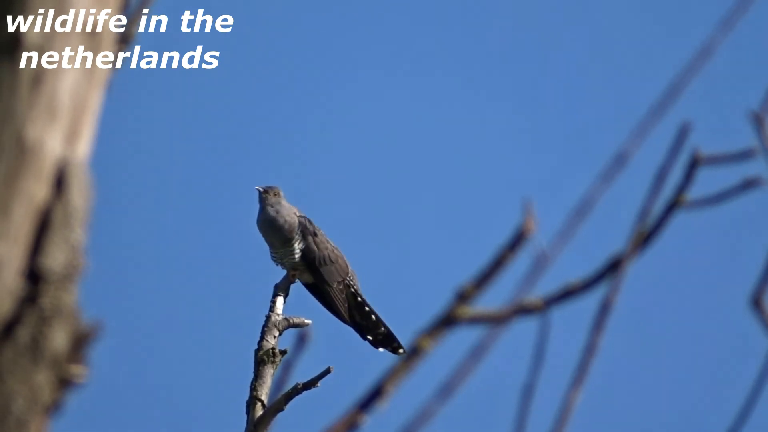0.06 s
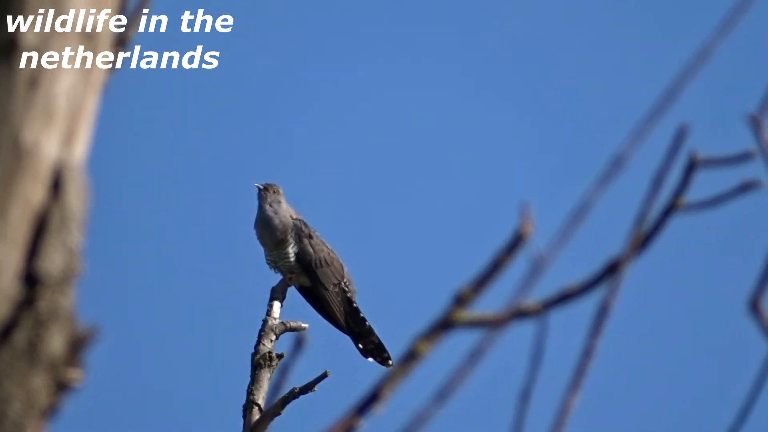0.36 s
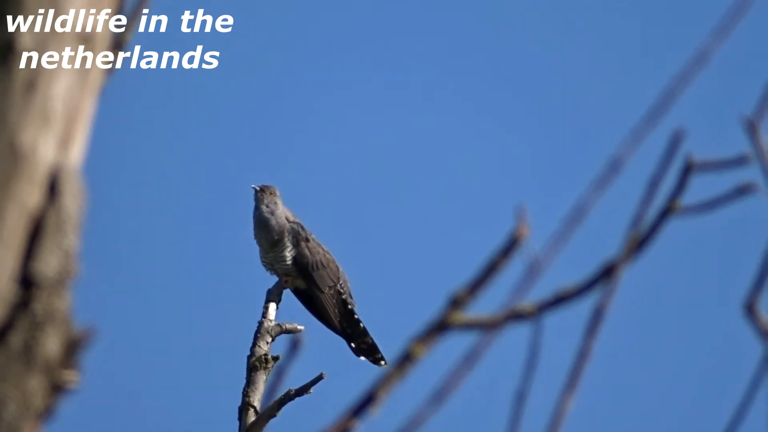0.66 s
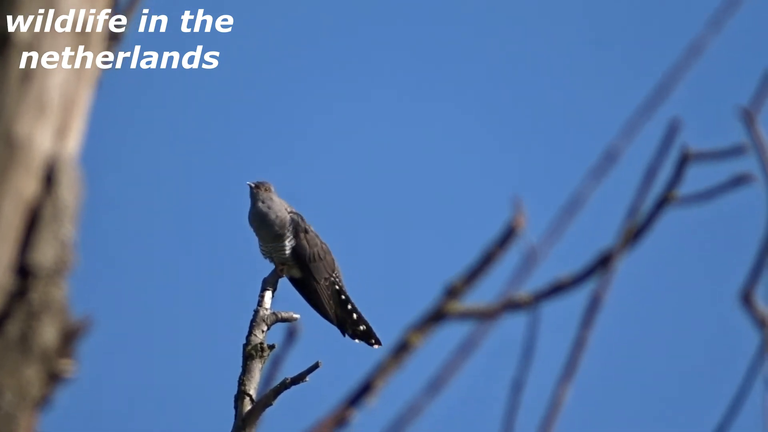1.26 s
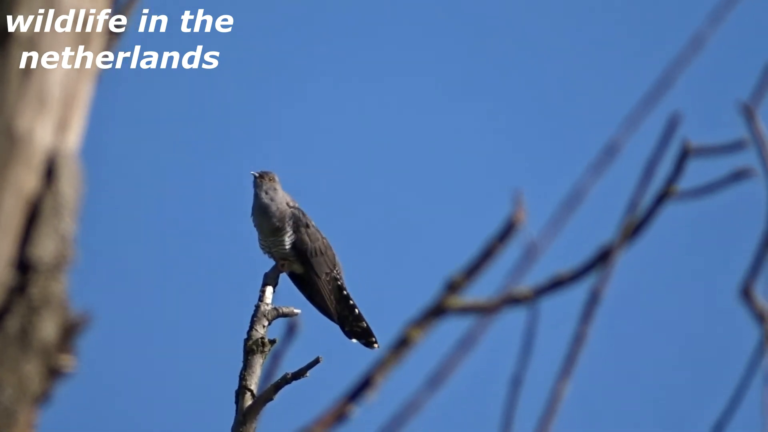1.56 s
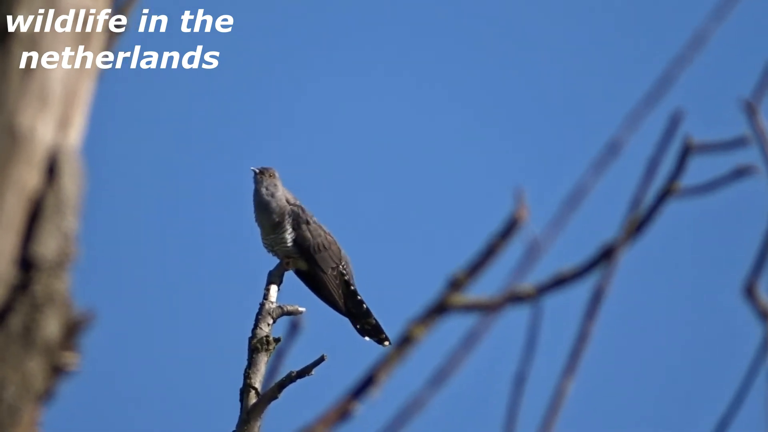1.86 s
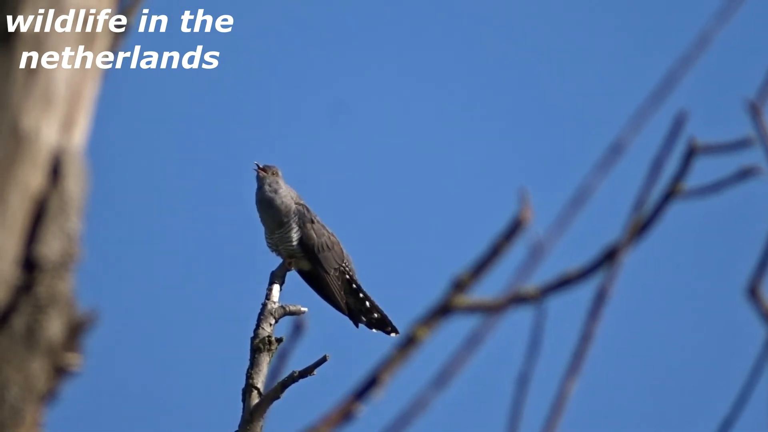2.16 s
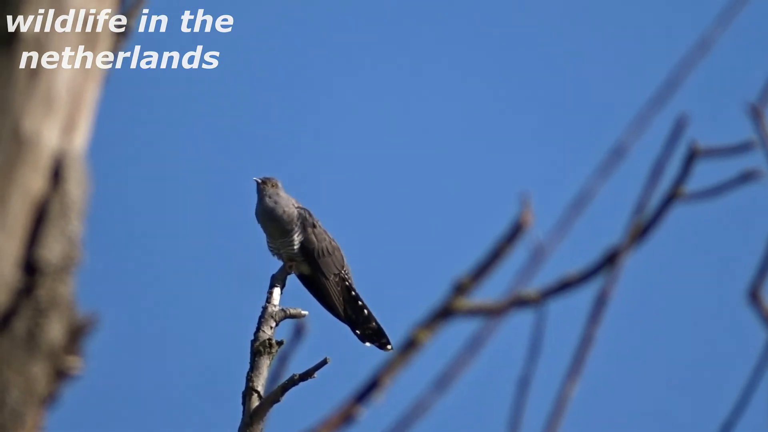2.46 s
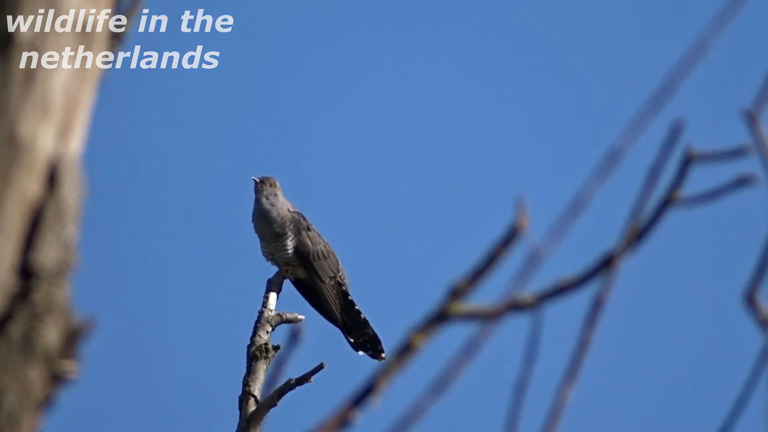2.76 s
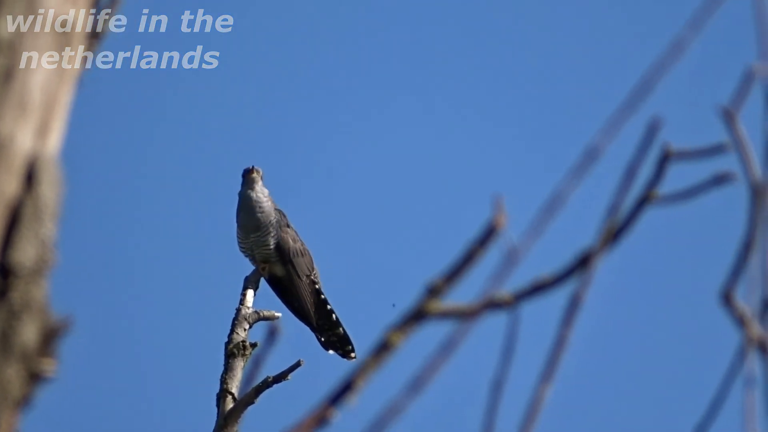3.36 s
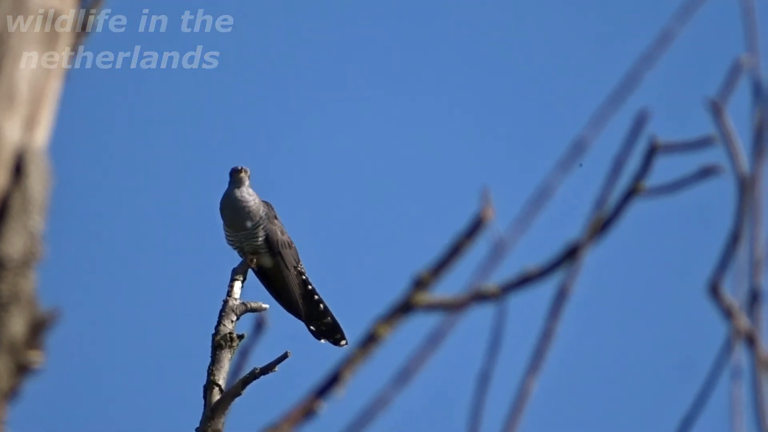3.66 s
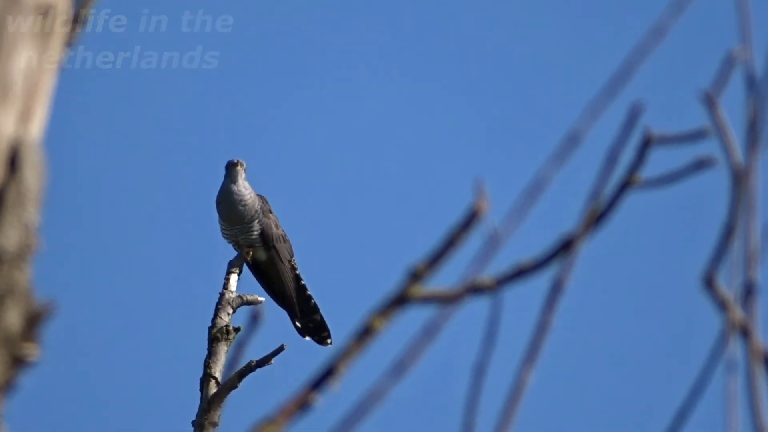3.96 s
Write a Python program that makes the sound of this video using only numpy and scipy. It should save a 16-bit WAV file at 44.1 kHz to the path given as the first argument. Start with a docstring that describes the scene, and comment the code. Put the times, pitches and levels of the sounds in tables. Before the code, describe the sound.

A cuckoo sings one low note at the start, then its falling two-note call at about 1.1, 2.3 and 3.5 seconds, echoing among trees. Small birds chirp and whistle throughout, over a soft hush, distant birdsong and a faint low hum. Light twig-like ticks come at about 1.8 and 3.6 seconds, and a small bird adds four quick swooping notes from 3 seconds.

```python
"""Over a soft outdoor hush, a low distant drone and a far chorus, small birds begin to whistle, a cuckoo
sings a long, level "coo", and a far bird pipes one note at intervals. From about one second on, the
cuckoo gives its full call three times: a short arched "cu", then the "coo", both nearly pure tones.
A twig-like tick falls midway; near the end come a warbler's four swoops, another tick and thin rasps.
The trees scatter the cuckoo's notes, the whistles and the piping into reverberation."""
import sys
import numpy as np
from scipy import signal
from scipy.fft import rfft, irfft
from scipy.io import wavfile
from scipy.ndimage import uniform_filter1d

SR = 44100
rng = np.random.default_rng(int(sys.argv[2]) if len(sys.argv) > 2 else 0)


def inscribe(sig):
    """Save sig as 16-bit PCM at rate SR to the path in sys.argv[1].

    A 1-D sig is mono; a 2-D sig holds one channel per row.
    Samples are clipped to [-1, 1] before scaling.
    """
    pcm = np.round(np.clip(np.atleast_2d(sig).T, -1, 1) * 32767)
    wavfile.write(sys.argv[1], SR, pcm.astype(np.int16))


N = 176400
# The cuckoo's "cu". Each row: start in seconds, length in seconds, top pitch in Hz, level in dB.
CU_NOTES = [(1.094, 0.0995, 699.7, -31), (2.282, 0.102, 702, -30), (3.526, .093, 697.7, -31)]
SIDE_SIGNS = np.array([[1], [-1]])  # a side signal adds on the left and subtracts on the right


def amp(db):
    """The decibel scale: 20 dB is a tenfold amplitude."""
    return 10 ** (np.asarray(db) / 20)


def unit(x):
    """Normalisation to an rms of 1."""
    return x / np.sqrt(np.mean(x ** 2))


def walk(rate):
    """Low-pass noise: random steps, `rate` a second, smoothed to a wander with a spread near 1."""
    k = max(int(SR / rate), 2)
    steps = np.repeat(rng.standard_normal(N // k + 1), k)
    return 1.3 * uniform_filter1d(uniform_filter1d(steps, k), k)[:N]


def colour(x, points):
    """Spectral shaping by a curve of (Hz, dB) points."""
    hz, db = np.array(points, float).T
    f = np.maximum(np.fft.rfftfreq(2 * N, 1 / SR), 1)
    return irfft(rfft(x, 2 * N) * amp(np.interp(np.log(f), np.log(hz), db)))[..., :N]


def span(start, length):
    """Sampling of a note: its indices i and the share u of it that has passed."""
    i = np.arange(max(int(start * SR), 0), min(int((start + length) * SR), N))
    return i, np.clip((i / SR - start) / length, 0, 1)


def fade(u, rise, fall):
    """A raised-cosine envelope; rise and fall are shares of the note."""
    attack = np.sin(np.pi / 2 * np.minimum(u / rise, 1))
    release = np.sin(np.pi / 2 * np.minimum((1 - u) / fall, 1))
    return (attack * release) ** 2


def phase_of(hz):
    """Phase is the running integral of frequency."""
    return 2 * np.pi * np.cumsum(hz) / SR


def trees(x, near_db, near_t60, far_db, far_t60, width):
    """Reverberation: quick scatter from near branches and a long, exponential tail from the wood."""
    t = np.arange(2 * SR) / SR
    out = 0
    for db, t60, onset_s in ((near_db, near_t60, .015), (far_db, far_t60, .08)):
        envelope = np.minimum(t / onset_s, 1) ** 2 * np.exp(-np.log(1000) * t / t60)
        mid, side = rng.standard_normal((2, len(t))) * envelope
        response = unit(mid + width * side * SIDE_SIGNS) / np.sqrt(len(t))
        out = out + amp(db) * signal.fftconvolve(x[None], response, axes=1)[:, :N]
    return out


def hush():
    """Broadband ambient noise, nearly coherent between the two sides in the bass."""
    # Each row: frequency in Hz, relative spectral density in dB.
    spectrum = [(22, -15.5), (38, -7.5), (55, -2.5), (72, -0.5), (95, -5.5), (150, -8.5), (210, -17),
                (450, -14.5), (700, -12), (1150, -21), (1700, -26.5), (2300, -26.5), (4200, -35),
                (5200, -43), (7500, -46.5), (9000, -33), (11000, -36)]
    mid, side = colour(rng.standard_normal((2, N)), spectrum)
    side = colour(side, [(50, -26), (250, -6), (5000, -7)])
    return unit(mid + side * SIDE_SIGNS) * amp(-52)


def drone():
    """A distant hum: three low partials under slow random amplitude and frequency modulation."""
    # Each row: frequency in Hz, level in dB.
    partials = [(54, -52), (93, -60.5), (146, -63)]
    return sum(amp(db + 1.4 * walk(9.5)) * np.sin(phase_of(hz * (1 + .0396 * walk(12))))
               for hz, db in partials)


def chorus():
    """Incoherent summation: many far birds blur into noise bands that flicker separately."""
    # Each row: frequency in Hz, relative spectral density in dB.
    spectrum = [(1800, -26.5), (2400, -8), (2900, -1.5), (3500, 0), (4050, -5), (4500, -15), (5200, -42)]
    # Each row: time in seconds, level in dB.
    levels = [(0, -51), (1.0, -55.5), (1.65, -53), (2.1, -57.5), (2.7, -54), (3.3, -54.5), (4, -50.5)]
    flicker_db = 4
    out, t = 0, np.arange(N) / SR
    for hz in np.geomspace(2000, 5000, num=14):
        band = [(hz / 1.12, -60), (hz / 1.03, 0), (hz * 1.03, 0), (hz * 1.12, -60)]
        mid, side = colour(rng.standard_normal((2, N)), band)
        out = out + amp(flicker_db * walk(13)) * (mid + .23 * side * SIDE_SIGNS)
    return unit(colour(out, spectrum)) * amp(np.interp(t, *np.array(levels).T))


def cuckoo_echo(call):
    """Reflection: single echoes from nearby trunks, then the wood's uneven reverberant tail."""
    # Each row: delay in seconds, gain in dB.
    reflections = [(.066, -19), (.182, -32)]
    # The wood returns the higher note more strongly. Each row: frequency in Hz, gain in dB.
    wood_gain = [(560, -1), (690, 2)]
    wood = lambda x: trees(x, near_db=-22, near_t60=.37, far_db=-18.5, far_t60=2.8, width=.067)
    trunks = sum(amp(db) * np.pad(call, (int(delay * SR), 0))[:N] for delay, db in reflections)
    # Of a "cu" sung just before the scene opens, only the echo is heard.
    i, _ = span(*CU_NOTES[0][:2])
    earlier = wood(np.pad(call[i], (0, N - len(i))))
    elapsed = int(.17 * SR)
    tail = wood(call) + np.pad(earlier[:, elapsed:], ((0, 0), (0, elapsed)))
    return colour(trunks + tail * amp(2 * walk(45)), wood_gain)


def whistles():
    """Frequency glides: the pitch of each songbird note follows a cubic through four points."""
    # Each row: start and length in seconds, pitch in Hz at the start, one third, two thirds
    # and the end, level in dB before the treble loss.
    glides = [ (0.081, 0.14, 2730, 3000, 3470, 4600, -48.5), (0.182, 0.035, 3345, 3000, 2550, 2350, -46.5),
              (.385, .122, 3088, 3050, 2950, 2800, -35), (0.616, .064, 4500, 4400, 4300, 4000, -41.5),
              (0.692, .087, 3700, 3750, 3830, 3700, -36.5), (.836, .087, 5900, 4340, 4130, 4200, -36.5),
              (0.871, .11, 2730, 3100, 3250, 3650, -47), (.981, .048, 3880, 3760, 3700, 3000, -36.5),
              (1.016, .058, 3256, 3150, 3050, 3130, -35.5), (1.109, .092, 3292, 3020, 2800, 2850, -36.5),
              (1.268, .112, 3420, 3250, 3170, 3200, -42), (1.449, .041, 3850, 3640, 3400, 1900, -39.5),
              (1.33, 0.3, 2775, 2820, 2820, 2100, -55.5), (1.781, 0.18, 2750, 3010, 3600, 4540, -47.5),
              (2.377, .3, 3023, 2800, 2610, 2320, -54), (2.41, .075, 6910, 6700, 6500, 5000, -57),
              (2.575, 0.1, 7000, 6450, 4700, 4500, -56), (2.754, .08, 4200, 5450, 5050, 8000, -47.5),
              (2.852, 0.16, 2850, 3140, 3500, 4700, -47.5), (2.903, .078, 4570, 4700, 5700, 4400, -48),
              (3.041, .13, 9000, 7600, 7400, 7600, -55), (3.183, .12, 7480, 7400, 7700, 8000, -55),
              (3.472, 0.047, 3470, 3900, 4350, 3300, -45), (3.701, 0.033, 4110, 3750, 3250, 2750, -37),
              (3.798, .04, 4120, 3600, 3050, 2500, -38), (3.836, 0.081, 2780, 2840, 2700, 2400, -37.5),
              (3.884, 0.04, 3880, 3700, 3150, 2300, -36.5), (3.975, .047, 3990, 3700, 3150, 2700, -38.5)]
    for start, length, *pitches, db in glides:
        i, u = span(start, length)
        hz = np.polyval(np.polyfit(np.linspace(0, 1, 4), pitches, 3), u)
        yield i, hz, db, fade(u, .2, .2)


def songbirds(notes):
    """The direct-to-reverberant ratio falls with distance: fainter notes echo more and are rougher."""
    near_db, echo_per_db, roughness_per_db = -31, .34, .24
    direct, scattered = np.zeros((2, N))
    waver, flutter = .0049 * walk(700), 1.5 * walk(110)
    for i, hz, db, envelope in notes:
        distance_loss_db = max(near_db - db, 0)
        roughness = roughness_per_db * distance_loss_db
        tone = np.sin(phase_of(hz * (1 + roughness * waver[i])))
        note = amp(db + flutter[i] * np.sqrt(roughness)) * envelope * tone
        direct[i] += note
        scattered[i] += note * amp(echo_per_db * distance_loss_db)
    return direct + trees(scattered, near_db=-13, near_t60=.25, far_db=-14, far_t60=1.1, width=.4)


def cuckoo():
    """Nearly pure tones with a faint octave: "cu" arches and swells as it drops, "coo" holds its pitch."""
    # The course of "cu". Each row: share of the note, ratio to the top pitch, gain in dB.
    cu_shape = [(0, .84, -5), (.17, .975, 0), (.38, .995, 0), (.56, 1.01, -1.3), (.68, .985, .8),
                (.85, .89, 5.6), (1, .85, 0)]
    # Each row: start in seconds, length in seconds, pitch in Hz, level in dB.
    coo_notes = [(0.097, 0.19, 561.4, -27.5), (1.35, 0.18, 561, -27), (2.542, 0.18, 563.6, -27.5),
                 (3.806, 0.1444, 565, -27.5)]
    cu_attack_s, cu_release_s = .0075, .012
    coo_attack_s, coo_release_s, coo_swell_db = .037, .028, 2.5
    out, waver = np.zeros(N), 1 + .002 * walk(60)
    voice = lambda hz: np.sin(phase_of(hz)) + amp(-45) * np.sin(2 * phase_of(hz))
    share, ratio, shape_db = np.array(cu_shape).T
    contour = lambda u, values: uniform_filter1d(np.interp(u, share, values), size=350)
    for start, length, hz, db in CU_NOTES:
        i, u = span(start, length)
        envelope = fade(u, cu_attack_s / length, cu_release_s / length)
        out[i] += amp(db + contour(u, shape_db)) * envelope * voice(hz * contour(u, ratio) * waver[i])
    for start, length, hz, db in coo_notes:
        i, u = span(start, length)
        envelope = fade(u, coo_attack_s / length, coo_release_s / length)
        out[i] += amp(db - coo_swell_db * (2 * u - 1) ** 2) * envelope * voice(hz * waver[i])
    return out


def piping():
    """A harmonic series led by its second partial: a far, reedy note that sags and is mostly echo."""
    # Each row: start in seconds, length in seconds, fundamental in Hz, base level in dB.
    notes = [(0.184, 0.21, 2007, -61), (1.497, 0.21, 1976, -63.5), (3.275, .23, 1909, -62.5)]
    harmonics_db, sag = (3.5, 8, -4.5), .015
    out, waver = np.zeros(N), 1 + .011 * walk(150)
    for start, length, hz, db in notes:
        i, u = span(start, length)
        phase = phase_of(hz * (1 + sag * (.5 - u)) * waver[i])
        tone = sum(amp(gain_db) * np.sin(k * phase) for k, gain_db in enumerate(harmonics_db, 1))
        out[i] += amp(db) * fade(u, .089, .3) * tone
    return out + trees(out, near_db=-2, near_t60=.4, far_db=1, far_t60=1.6, width=.4)


def ticks():
    """Transients: dry, twig-like snaps of bright noise with exponential decay."""
    # Each row: start in seconds, level in dB before the treble loss.
    snaps = [(1.83, -24.5), (3.633, -29)]
    out, decay_s = np.zeros(N), .0031
    noise = unit(colour(rng.standard_normal(N), [(1200, -36), (3000, -15), (11000, -8.5)]))
    for start, db in snaps:
        i, u = span(start, 10 * decay_s)
        out[i] += amp(db) * np.exp(-10 * u) * noise[i]
    return out


def warbler_swoops():
    """Frequency sweeps: each note falls from high up, through a dip and over an arch."""
    # Each row: start and length in seconds, dip and arch in Hz, level in dB before the treble loss.
    swoops = [(3.054, 0.1, 3470, 4060, -42.5), (3.213, .103, 3596, 4087, -44),
              (3.374, .092, 3630, 4180, -42), (3.533, 0.088, 3262, 4100, -42.5)]
    top_hz, end_hz = 5200, 3500
    turns = [.05, .32, .68, 1]  # shares of the note at the top, dip, arch and end
    for start, length, dip_hz, arch_hz, db in swoops:
        i, u = span(start, length)
        leg = np.interp(u, turns, np.arange(4))
        eased = np.floor(leg) + np.sin(np.pi / 2 * (leg % 1)) ** 2
        hz = np.interp(eased, np.arange(4), [top_hz, dip_hz, arch_hz, end_hz])
        yield i, hz, db, fade(u, .42, .2)


def rasps():
    """Narrow-band noise: random modulation spreads a high carrier into a thin, hoarse chirp."""
    # Each row: start in seconds, length in seconds, centre frequency in Hz, level in dB.
    chirps = [(3.63, .075, 8200, -67), (3.62, .15, 6700, -75), (3.735, .085, 7900, -71)]
    out, t = np.zeros(N), np.arange(N) / SR
    for start, length, hz, db in chirps:
        i, u = span(start, length)
        modulation = walk(1980) + 1j * walk(1980)
        band = np.real(modulation * np.exp(2j * np.pi * hz * t))
        out[i] += amp(db) * fade(u, .22, .2) * band[i]
    return out


def scene():
    """Superposition: the birds and their echoes add to the hush and the drone."""
    # Treble loss on the songbirds, piping and ticks. Each row: frequency in Hz, gain in dB.
    treble_loss = [(1500, 0), (4150, 0), (4600, -11), (5200, -20), (7000, -25), (11000, -22)]
    call = cuckoo()
    echo = cuckoo_echo(call)
    song = songbirds([*whistles(), *warbler_swoops()])
    dulled = colour(song + piping() + ticks(), treble_loss)
    return call + echo + dulled + rasps() + chorus() + hush() + drone()


def record(dry):
    """Stereo time and level cues: the left microphone hears later and duller; both are low-passed."""
    # Left against right, equal in the bass. Each row: frequency in Hz, gain in dB.
    left_bass = [(700, 0)]
    left_treble = [(1200, 1), (2000, -4.5), (3000, -3.5), (3500, -6.5), (4000, -15), (5000, -7.5),
                   (7000, -4.5), (11000, -3.5)]
    lag_s, cutoff_hz = .00005, 11100
    delay = np.exp(-2j * np.pi * np.fft.rfftfreq(2 * N, 1 / SR) * lag_s)
    left = irfft(rfft(colour(dry[0], left_bass + left_treble), 2 * N) * delay)[:N]
    lowpass = signal.ellip(10, .2, 70, cutoff_hz, fs=SR, output="sos")
    return signal.sosfilt(lowpass, np.array([left, dry[1]]))


dry = scene()
out = record(dry)
inscribe(out)
```